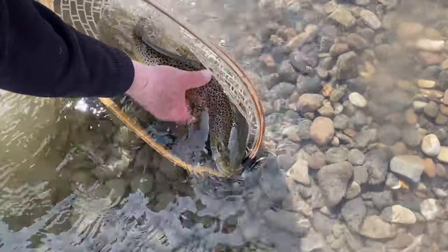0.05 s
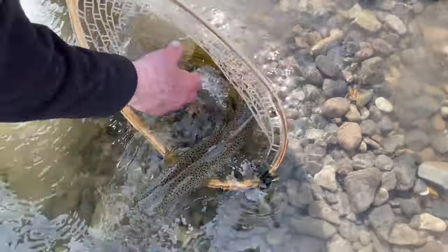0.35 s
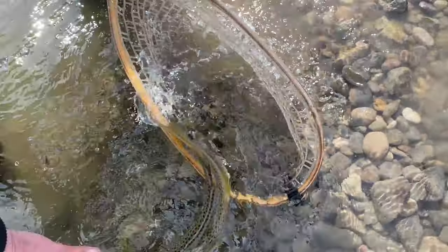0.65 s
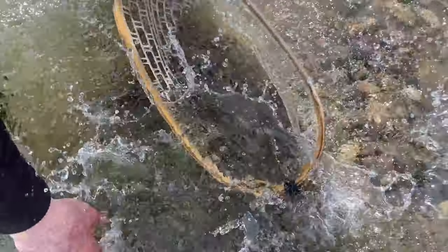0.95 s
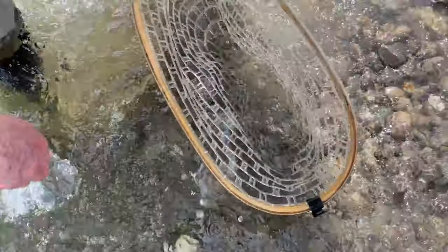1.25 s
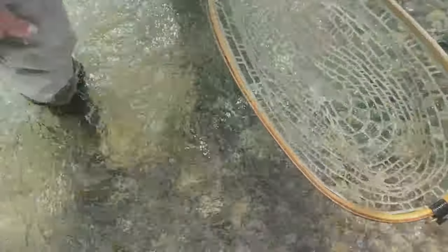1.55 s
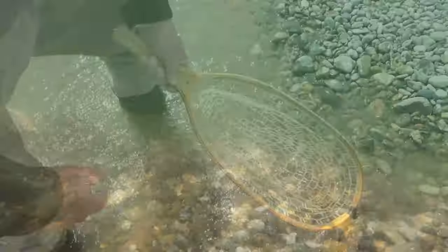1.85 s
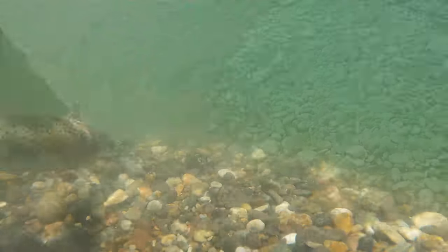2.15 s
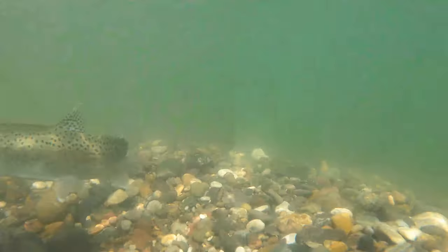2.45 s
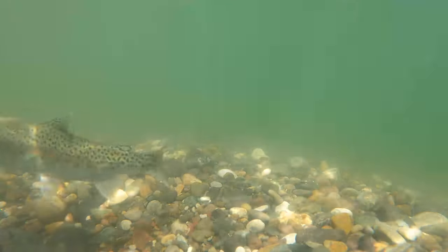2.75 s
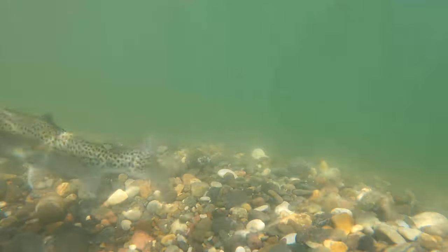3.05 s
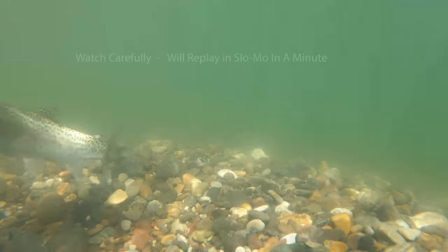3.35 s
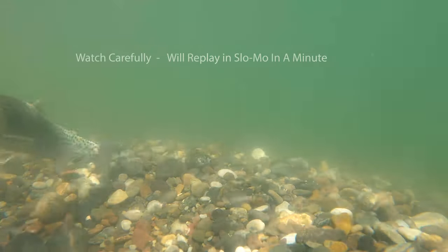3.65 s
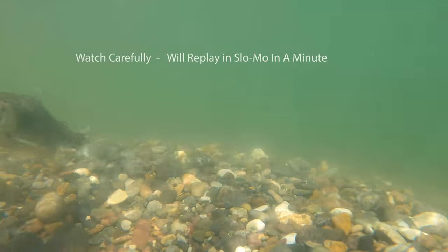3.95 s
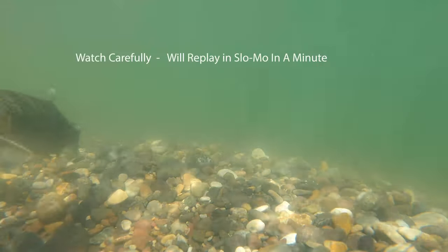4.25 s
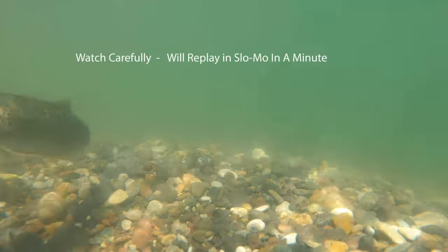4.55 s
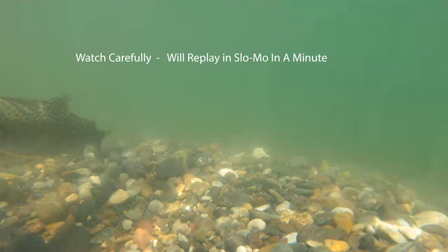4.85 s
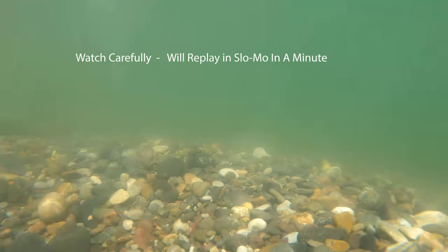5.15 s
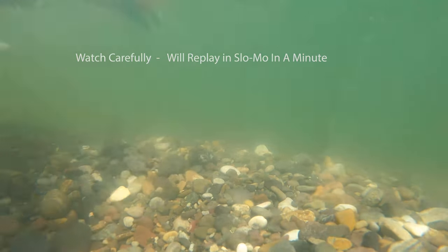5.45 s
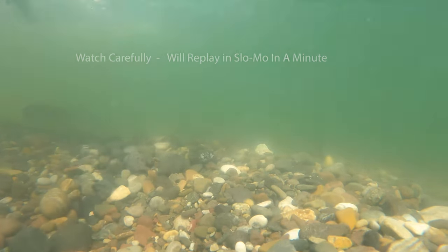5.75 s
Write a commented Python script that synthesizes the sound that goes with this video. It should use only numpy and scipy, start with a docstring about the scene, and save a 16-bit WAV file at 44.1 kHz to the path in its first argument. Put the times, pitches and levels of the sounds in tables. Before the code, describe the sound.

The sound opens close to the surface of a shallow river, with light lapping, a few drips and wind bumping the microphone. From about 0.4 to 1.2 seconds a fish thrashes out of a landing net in quick splashes, full of plops, bubbles and fine spray. The water then sloshes more hollowly as the gusts grow stronger, rumbling and popping. At 1.8 seconds everything cuts underwater and becomes much quieter: a thin, steady hiss with a faint low hum and soft swells of current. Grit ticks occasionally on the camera housing, with one clearer click near 3.9 seconds. Just after 5 seconds the fish bolts past, and its wake strikes the housing with sudden loud, deep thumps. Pebbles click sharply and gravel scrapes by in muffled showers, while churning, gurgling water continues to the end at about 6 seconds.

```python
"""Splashing and gusts of wind, close up: a trout thrashes out of a landing net in river shallows,
its tail whipping up bubbles and spray beside a small waterproof camera.
At 1.83 s the sound cuts to under water: the river hisses in the camera's housing and grit ticks on it.
Near 5 s the fish bolts past: its wake thumps the housing, throws gravel and leaves the water churning."""
import sys
import numpy as np
from scipy import signal
from scipy.fft import rfft, irfft, next_fast_len
from scipy.io import wavfile
from scipy.ndimage import uniform_filter1d

SR = 44100
rng = np.random.default_rng(int(sys.argv[2]) if len(sys.argv) > 2 else 0)


def inscribe(sig):
    """Save sig as 16-bit PCM at rate SR to the path in sys.argv[1].

    A 1-D sig is mono; a 2-D sig holds one channel per row.
    Samples are clipped to [-1, 1] before scaling.
    """
    pcm = np.round(np.clip(np.atleast_2d(sig).T, -1, 1) * 32767)
    wavfile.write(sys.argv[1], SR, pcm.astype(np.int16))


N = 264159
TIME = np.arange(N) / SR
DIVE_S = 1.83  # the microphone goes under


def amp(db):
    """Decibels to gain."""
    return 10 ** (np.asarray(db) / 20)


def unit(x):
    """Scale to rms 1."""
    return x / np.sqrt(np.mean(x ** 2))


def colour(x, points):
    """Causal filter through (freq_hz, gain_db) points, falling steeply beyond the ends; rms 1."""
    size = next_fast_len(N + 8192, True)
    octave = np.log2(np.maximum(np.arange(size // 2 + 1), 1) * SR / size)
    hz, db = np.transpose(points)
    outside = np.abs(octave - np.clip(octave, np.log2(hz[0]), np.log2(hz[-1])))
    log_gain = np.log(amp(np.interp(octave, np.log2(hz), db) - np.minimum(30 * outside, 70)))
    cepstrum = irfft(log_gain, size)
    response = np.exp(rfft(2 * cepstrum[:size // 2], size))
    return unit(irfft(rfft(x, size) * response, size)[..., :N])


def walk(rate):
    """Random levels held 1 / rate s and slewed; spread near 1."""
    hold = max(int(SR / rate), 1)
    return uniform_filter1d(np.repeat(rng.standard_normal(N // hold + 1), hold), hold)[:N]


def noise():
    """White noise."""
    return rng.standard_normal(N)


def patter(rate, spread_db):
    """Random impulses, rate a second, a few far stronger than the rest."""
    size = amp(spread_db * np.minimum(rng.exponential(size=N), 4))
    return unit((rng.random(N) < rate / SR) * size * np.sign(noise()))


def stereo(mid, side, width):
    """Left and right from a shared and an opposed part."""
    return np.array([mid + width * side, mid - width * side])


def add(out, start_s, sound):
    """Mix a short sound in at start_s."""
    i = int(np.clip(start_s * SR, 0, N - 1))
    out[..., i:i + sound.shape[-1]] += sound[..., :N - i]


def burst(start_s, length_s, attack_s, fade_s):
    """An envelope that rises at start_s, holds until its length is over, then dies away."""
    t = TIME - start_s
    return np.clip(t / attack_s, 0, 1) * np.exp(-np.maximum(t - length_s, 0) / fade_s)


def together(envelopes):
    """Unrelated sounds add in power."""
    return np.sqrt(sum(e ** 2 for e in envelopes))


def bursts(rows, attack_s, fade_s):
    """One envelope from rows of start_s, level_db, length_s."""
    return together(amp(db) * burst(s, length_s, attack_s, fade_s) for s, db, length_s in rows)


def reflect(x, lag_s, share):
    """Add an echo that arrives lag_s later."""
    return x + share * np.array([np.interp(TIME - lag_s, TIME, channel) for channel in x])


def ring(hz, cycles, glide=0.):
    """A damped resonance that falls by 1/e in so many cycles while its pitch glides up."""
    turns = np.arange(int(6 * cycles * SR / hz) + 2) * hz / SR
    phase = 2 * np.pi * turns * (1 + glide * turns / cycles / 2)
    return np.sin(phase) * np.exp(-turns / cycles) * (1 - np.exp(-2 * turns))


def bubble_cloud(start_s, end_s, low_hz, high_hz, cycles, spread_db, scatter, count):
    """Many small bubbles of mixed size and life, scattered between left and right."""
    out = np.zeros((2, N))
    for when, size, life, strength, place, lag in rng.random((count, 6)):
        hz = low_hz * (high_hz / low_hz) ** size
        loudness = amp(-spread_db * np.log(strength + .03)) * np.sqrt(hz / low_hz)
        bubble = ring(hz, cycles * (.5 + life) * np.sqrt(hz / low_hz), glide=.015) * loudness
        s = start_s + when * (end_s - start_s)
        pan = scatter * (place - .4)
        add(out[0], s, (1 + pan) * bubble)
        add(out[1], s + scatter * .00034 * (lag - .5), (1 - pan) * bubble)
    return out


# The river from inside the submerged housing: its hiss, its low resonance, the current: freq_hz, gain_db
HISS_SPECTRUM = [(260, -65.5), (450, -35), (665, -30), (837, -17.5), (949, -17.5), (1130, -17),
                 (1250, -10.5), (1470, -2), (1540, -2), (1810, -8.5), (2150, -17.5), (2460, -31.5),
                 (3640, -30.5), (4220, -43.5), (7000, -53), (9100, -88), (15400, -120)]
HUM_SPECTRUM = [(20, -6.5), (40, -7), (70, -11.5), (110, -13.5), (165, 1.5), (215, -3), (270, -12),
                (350, -18.5), (500, -30)]
CURRENT_SPECTRUM = [(30, -12), (70, -7.5), (140, 0.5), (200, -5), (260, -28), (350, -38)]
# Slow swells of current round the housing: start_s, level_db, length_s
CURRENT_SWELLS = [(1.932, -45.5, 0.13), (2.187, -56.5, 0.18), (3.167, -61, 0.25), (3.914, -49.5, 0.13),
                  (4.62, -54, 0.094)]


def river(hiss_db=-52, hum_db=-63):
    """Moving sand and water hiss and hum through the housing's resonances; the current swells softly."""
    hiss = colour(noise() + amp(1) * patter(600, 2.6), HISS_SPECTRUM) * amp(hiss_db + .27 * walk(6.2))
    hum = colour(noise(), HUM_SPECTRUM) * amp(hum_db + 1.2 * walk(15))
    current = bursts(CURRENT_SWELLS, attack_s=.058, fade_s=.14) * colour(noise(), CURRENT_SPECTRUM)
    return hiss + hum + current


# Wind right on the microphone ports, just above the river: freq_hz, gain_db
RUMBLE_SPECTRUM = [(25, -44.5), (50, -22), (80, -2), (125, 8), (200, 2.5), (330, -8.5)]
FLUTTER_SPECTRUM = [(180, -30), (300, 1.5), (600, -1), (900, -8), (1600, -18)]
# Its gusts: start_s, length_s, rumble_db, flutter_db
WIND_GUSTS = [(-.01, 0.035, -33, -37.5), (0.178, 0.057, -26.5, -34.5), (0.258, .06, -22, -35.5),
              (0.373, 0.037, -35, -53), (0.564, 0.035, -26.5, -32), (0.614, .125, -25.5, -28),
              (0.801, 0.02, -23.5, -31.5), (.89, 0.033, -24.5, -24.5), (0.925, 0.11, -41.5, -28),
              (1.065, .035, -23.5, -39), (1.137, 0.067, -23, -37), (1.248, 0.022, -24, -36),
              (1.326, 0.058, -24, -28), (1.386, 0.037, -21.5, -22), (1.465, 0.059, -21.5, -13.5),
              (1.542, .04, -22, -19), (1.588, 0.086, -20, -26.5), (1.738, 0.034, -18, -22),
              (1.81, .02, -32, -30.5)]


def wind():
    """Gusts rumble on the ports; the stronger ones break into a ragged flutter, more on the left."""
    gusts = [amp(levels_db)[:, None] * burst(s, length_s, attack_s=.0098, fade_s=.022)
             for s, length_s, *levels_db in WIND_GUSTS]
    breeze = amp([[-41], [-50]])  # rumble and flutter between gusts
    rumble_level, flutter_level = together(gusts + [breeze])
    rumble = colour(stereo(noise(), noise(), width=.34), RUMBLE_SPECTRUM)
    flutter = colour(stereo(patter(900, 3.44), patter(990, 3), width=.66), FLUTTER_SPECTRUM)
    return amp(1) * rumble_level * rumble + amp([[-1.5], [-4.5]]) * flutter_level * flutter


# Eddies striking the microphone, of air and later of water: start_s, pitch_hz, level_db, decay_s
EDDY_HITS = [(.191, 650, -20, 0.011), (.266, 710, -16, 0.0038), (.301, 906, -17.5, 0.022),
             (0.3122, 1414, -13.5, 0.014), (.663, 687, -18, 0.0098), (.901, 585, -13, 0.0079),
             (1.152, 620, -16, 0.005), (1.262, 690, -17.5, 0.013), (1.414, 710, -7, 0.0092),
             (1.453, 886, -7, 0.01), (1.494, 610, -3.5, 0.0039), (1.503, 2290, -13.5, 0.0048),
             (1.5062, 2800, -5.5, 0.0026), (1.556, 997, -9, 0.0082), (1.576, 2110, -5.5, 0.002),
             (1.612, 926, -6.5, 0.0022), (1.649, 600, -16.5, .019), (1.7517, 1262, -11.5, 0.01),
             (2.687, 894, -52, .0033), (5.072, 495, -18, 0.013), (5.093, 617, -6, 0.014),
             (5.178, 1096, -6.5, 0.0034), (5.221, 398, -13.5, 0.0049), (5.442, 940, -2.5, 0.002),
             (5.983, 600, -5.5, 0.0049)]


def eddies(end_hz=160, fall_s=.003, rise_s=.0012, width=.45):
    """Each eddy hits sharply and slows as it passes: a thump whose pitch drops within milliseconds."""
    out, t = np.zeros((2, N)), TIME[:SR // 10]
    for s, hz, db, decay_s in EDDY_HITS:
        pitch = end_hz + (hz - end_hz) * np.exp(-t / fall_s)
        phase = 2 * np.pi * np.cumsum(pitch) / SR
        envelope = amp(db + 3) * (1 - np.exp(-(t / rise_s) ** 2)) * np.exp(-t / decay_s)
        add(out, s, envelope * stereo(np.sin(phase), np.sin(phase + 1.2), width * (s < DIVE_S)))
    return out


# Grit and pebbles striking the housing under water: start_s, level_db, pitch_hz
STONE_HITS = [(2.038, -38, 3530), (2.218, -50, 3780), (2.352, -42, 2160), (2.384, -36, 1617),
              (3.245, -54.5, 3660), (3.667, -51.5, 3580), (3.9348, -22, 1644), (3.9553, -35, 1550),
              (4.051, -52, 3620), (4.191, -55, 3630), (4.334, -52.5, 3590), (4.607, -53.5, 3580),
              (5.129, -4, 1980), (5.142, -5, 1950), (5.1466, -8, 3310), (5.167, 2, 1680), (5.188, -6, 1750),
              (5.206, -6.5, 1700), (5.279, -3, 1540), (5.378, -6.5, 1310), (5.402, -15.5, 1640),
              (5.542, -13.5, 1496), (5.756, -12.5, 1197), (5.8002, -3.5, 1696)]


def stone_ticks(ring_s=.0019, grit_s=.0056):
    """Each stone rings the housing briefly and grinds on a little; the thick shell muffles the contact."""
    rings, contact = np.zeros(N), np.zeros(N)
    t = TIME[:SR // 20]
    for s, db, hz in STONE_HITS:
        add(rings, s, amp(db + 2) * ring(hz, cycles=hz * ring_s))
        grit = amp(-20) * rng.standard_normal(len(t)) * np.exp(-t / grit_s)
        add(contact, s, amp(db) * ((t == 0) + grit))
    shell = [(900, -9.5), (1700, 11.5), (2450, -16.5), (3600, -5.5), (4200, -16.5), (5200, -31),
             (6300, -44.5), (7500, -35), (12000, -60)]
    muffled = colour(contact, shell) * np.sqrt(np.mean(contact ** 2))
    return signal.sosfilt(signal.butter(6, 4100, fs=SR, output="sos"), rings) + amp(3) * muffled


# Gravel scraping, heard through the housing wall: freq_hz, gain_db
GRAVEL_SPECTRUM = [(900, -5), (1150, -6.5), (1550, 6), (2000, -3.5), (2450, -23.5), (2720, -12.5),
                   (3000, -28), (3300, -20.5), (3650, -15), (4150, -35.5), (4700, -35), (5200, -51.5),
                   (6300, -58.5), (7500, -52.5), (9000, -66.5)]
# Showers of it swept along the housing: start_s, level_db, length_s
GRAVEL_SHOWERS = [(5.116, -16, .07), (5.269, -24, 0.008), (5.365, -17, 0.037), (5.416, -20, .04),
                  (5.48, -25, 0.14), (5.614, -21, .03), (5.664, -24.5, 0.1), (5.862, -28, 0.1)]


def gravel(start_s=5.12, attack_s=.0082):
    """Gravel kicked up by the fish scrapes past in showers and rolls on between them."""
    showers = bursts(GRAVEL_SHOWERS, attack_s, fade_s=.033)
    rolling = amp(-30) * burst(start_s, 0, attack_s, fade_s=2.5)
    scrape = colour(patter(1800, 3) + amp(-8) * noise(), GRAVEL_SPECTRUM) * amp(1.5 * walk(60))
    return amp(-1.5) * together([showers, rolling]) * scrape


# The wake against the housing, as the fish passes close by: freq_hz, gain_db
PRESSURE_SPECTRUM = [(10, -6), (28, -0.5), (40, -1), (75, -7), (120, -16)]
BUFFET_SPECTRUM = [(60, -21), (100, -2), (170, 2), (240, -11), (350, -20)]
CHURN_SPECTRUM = [(200, -5.5), (300, 2.5), (600, 3.5), (850, -3.5), (1200, -15)]
# Its surges: start_s, length_s, pressure_db, buffet_db, churn_db
WAKE_SURGES = [(5.071, 0.026, -25, -12, -30), (5.118, 0.094, -13, -15.5, -30.5),
               (5.258, 0.11, -13, -23.5, -53), (5.368, 0.075, -15.5, -15, -25),
               (5.487, 0.15, -32, -29.5, -31), (5.676, 0.099, -30.5, -44, -25),
               (5.871, 0.1, -22, -31.5, -19.5)]


def wake(bolt_s=5.066, attack_s=.018, bow_db_per_s=48.5):
    """A bow wave runs ahead of the fish; then pressure surges rock the housing and trapped air gurgles."""
    surges = [amp(levels_db)[:, None] * burst(s, length_s, attack_s, fade_s=.023)
              for s, length_s, *levels_db in WAKE_SURGES]
    stirred_water = amp([[-29.5], [-31.5], [-34.5]]) * burst(bolt_s, 0, attack_s, fade_s=2.5)
    pressure, buffet, churn = together(surges + [stirred_water])
    bow_wave = amp(-50.5 - bow_db_per_s * np.abs(TIME - bolt_s))
    trapped_air = bubble_cloud(5, 6, 250, 1001, cycles=3.14, spread_db=2.5, scatter=0, count=600)[0]
    gurgle = colour(trapped_air, CHURN_SPECTRUM) * np.sqrt(SR / N)  # rms 1 over its one second
    rocking = (pressure + bow_wave) * colour(noise(), PRESSURE_SPECTRUM)
    thumps = amp(-.5) * buffet * colour(noise(), BUFFET_SPECTRUM)
    return rocking + thumps + amp(-2.5) * churn * gurgle


# Strokes of the tail in the shallows, close to the microphone: start_s, level_db, length_s
TAIL_STROKES = [(0.352, -32.5, 0.056), (0.475, -33, 0.05), (0.554, -36, 0.12), (0.652, -31, 0.05),
                (0.716, -29, 0.024), (0.77, -26.5, 0.023), (0.808, -27, 0.13), (0.948, -28.5, 0.096),
                (1.062, -30.5, 0.037), (1.181, -36, 0.077)]
FROTH_FADE_S, SPRAY_FADE_S = .051, .063


def tail_strokes(fade_s):
    """How hard the tail works the water, each stroke dying away in fade_s."""
    return bursts(TAIL_STROKES, attack_s=.022, fade_s=fade_s)


def thrashing():
    """The weight of ringing bubbles in the splash: greatest while the fish thrashes."""
    return np.interp(TIME, [.33, .37, 1.22, 1.35], [.3, 1, 1, .25])


# Fine and coarse spray landing round the microphone: freq_hz, gain_db
MIST_SPECTRUM = [(5000, -1.5), (8000, -1), (11000, -3), (15500, -11)]
SPRAY_SPECTRUM = [(2500, -14.5), (4500, 2.5), (7000, -8), (10000, -9.5), (15500, -10)]


def spray(fizz_s=1.214, left_lag_s=.00029):
    """Each stroke throws drops that rain back; water drips in between and leftover froth fizzes."""
    fizz = amp(-49.5) * burst(fizz_s, DIVE_S - fizz_s, attack_s=.11, fade_s=FROTH_FADE_S)
    dripping = amp(-67)
    level = together([amp(-10) * tail_strokes(SPRAY_FADE_S), fizz, dripping])
    mist = patter(3500, 5)
    # the camera's stereo processing delays the fine spray's hiss slightly on the left
    mist_left = np.roll(mist, round(left_lag_s * SR))
    fine = colour(np.array([mist_left, mist]), MIST_SPECTRUM)
    plinks = unit(bubble_cloud(0, DIVE_S, 3000, 9000, cycles=5, spread_db=4, scatter=1, count=1500))
    drops = stereo(patter(2500, 4.5), patter(2500, 4.5), width=.65)
    coarse = colour(.55 * thrashing() * plinks + drops, SPRAY_SPECTRUM)
    return level * amp(2.7 * walk(70)) * (fine + amp(-1.5) * coarse)


# Bubbling water from just above the surface, and slosh from the waterline: freq_hz, gain_db
BUBBLE_SPECTRUM = [(350, -34.5), (600, -11), (667, -2.5), (1010, -6), (1100, -9.5), (1210, -8.5),
                   (1920, -1.5), (6000, -16), (7800, -62), (13200, -120)]
SLOSH_SPECTRUM = [(600, -5), (1000, -1.5), (1400, -3.5), (1900, -3), (2300, -5.5), (2700, -6.5),
                  (3300, -11), (4100, -10), (4500, -14.5), (5000, -10), (5600, -24.5)]
# Water slopping in the net and round the sinking camera: start_s, level_db, length_s
NET_SLOPS = [(-.06, -42.5, 0.09), (1.28, -27.5, 0.19), (1.52, -35, 0.065), (1.559, -34, .1),
             (1.681, -33.5, .06)]


def splash():
    """The tail whips air into the water: bubbles ring, froth crackles, slops build and collapse."""
    slops = together(amp(db) * burst(s, length_s, attack_s=length_s, fade_s=.037)
                     for s, db, length_s in NET_SLOPS)
    lapping = amp(-48.5)
    level = together([tail_strokes(FROTH_FADE_S), slops, lapping])
    cloud = unit(bubble_cloud(0, DIVE_S, 600, 6000, cycles=2.4, spread_db=3.3, scatter=1, count=2400))
    froth = unit(stereo(patter(2200, 3.8), patter(2200, 3.8), width=.65)) * amp(2 * walk(110))
    water = .7 * thrashing() * cloud + .9 * froth
    # the slosh turns hollow as the camera sinks towards the surface and its echo comes ever sooner
    dipped = np.interp(TIME, [1.28, 1.4], [0, 1])
    echo_lag_s = np.interp(TIME, [1.35, 1.8], [.0032, .0018])
    slosh = reflect(colour(water, SLOSH_SPECTRUM), echo_lag_s, share=.6)
    return level * (amp(-4) * (1 - dipped) * colour(water, BUBBLE_SPECTRUM) + amp(2.5) * dipped * slosh)


def small_pockets():
    """Many small air pockets ring as they close behind each stroke."""
    cloud = bubble_cloud(0, DIVE_S, 900, 4200, cycles=3.2, spread_db=2.5, scatter=.41, count=130)
    pockets = unit(cloud) * np.sqrt(DIVE_S * SR / N)  # rms 1 over the time above water
    return amp(-6) * tail_strokes(FROTH_FADE_S) * pockets


# A few faint drips, then the plops of large air pockets in the splash, close by and a little to the left:
# start_s, pitch_hz, level_db
DRIPS_AND_PLOPS = [(.227, 2720, -35.5), (.245, 8600, -32), (.252, 2605, -35), (.268, 3730, -34),
                   (.3726, 1490, -14.5), (0.391, 2520, -16.5), (0.391, 1080, -17.5), (.460, 1410, -18),
                   (.468, 1880, -16), (.495, 1610, -15), (0.507, 1620, -15.5), (0.52, 3240, -19),
                   (.721, 3400, -12.5), (.736, 2880, -16), (.738, 1290, -12.5), (.788, 1840, -12),
                   (.833, 1940, -12), (0.833, 2670, -11), (.834, 4200, -16), (0.864, 1400, -13.5),
                   (.871, 1023, -9.5), (0.892, 4070, -13.5), (.919, 656, -7.5), (.933, 1770, -14),
                   (.953, 1390, -17), (.987, 1920, -17), (1.005, 3080, -16), (1.023, 757, -8.5),
                   (1.024, 2100, -16.5), (1.099, 1750, -16), (1.164, 1982, -19), (1.214, 2240, -10),
                   (1.216, 1004, -18)]


def plops(slap_s=.0016):
    """Each drip or closing air pocket makes a wet slap, then rings and rises in pitch."""
    out, slaps = np.zeros((2, N)), np.zeros(N)
    for s, hz, db in DRIPS_AND_PLOPS:
        plop = ring(hz, cycles=3.97, glide=.041)
        add(out[0], s, amp(db + 4) * plop)
        add(out[1], s + rng.uniform(-.000056, .00008), amp(db) * plop)
        add(slaps, s, amp(db - 14) * np.exp(-TIME[:SR // 20] / slap_s))
    out += slaps * colour(stereo(noise(), noise(), width=.6), BUBBLE_SPECTRUM)
    return reflect(out, lag_s=.0035, share=.35)


def scene():
    """Open air in stereo, then under water, where both ears hear the same."""
    submerged = np.clip((TIME - DIVE_S) * 1000, 0, 1)
    above = splash() + small_pockets() + spray() + plops() + wind()
    below = river() + wake() + gravel() + stone_ticks()
    return (1 - submerged) * above + submerged * below + eddies()


def record(dry):
    """The camera rounds only the highest peaks and cuts the top above 15850 Hz."""
    rounded = dry / (1 + dry ** 8) ** (1 / 8)
    return signal.sosfilt(signal.ellip(8, .2, 80, 15850, fs=SR, output="sos"), rounded)


dry = scene()
out = record(dry)
inscribe(out)
```